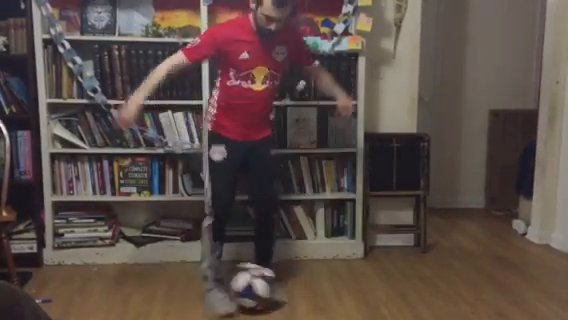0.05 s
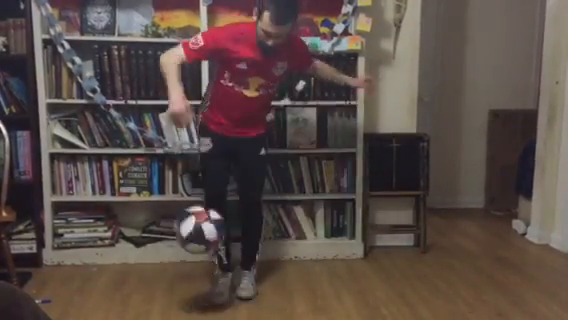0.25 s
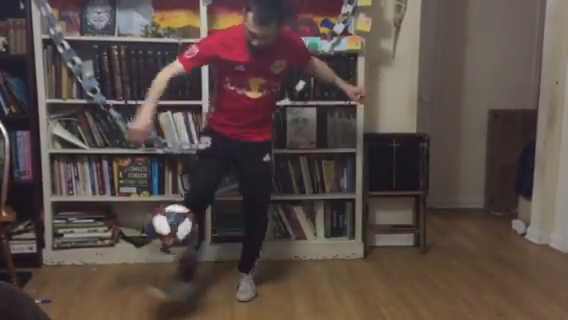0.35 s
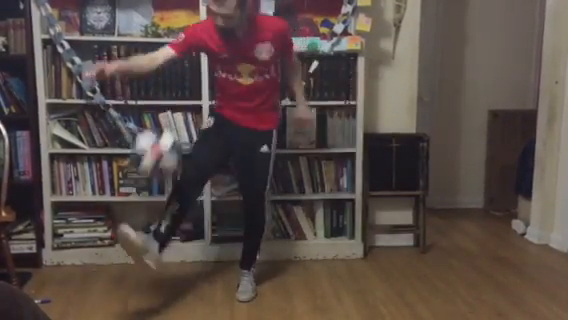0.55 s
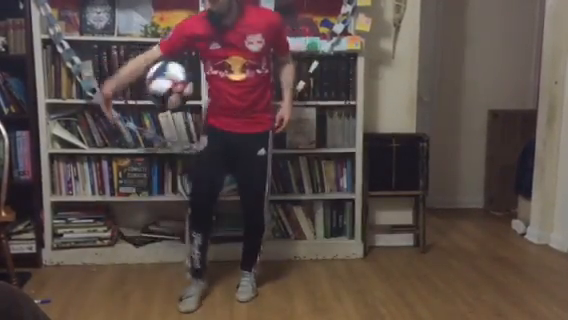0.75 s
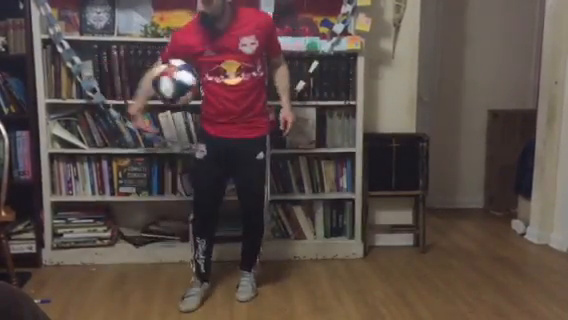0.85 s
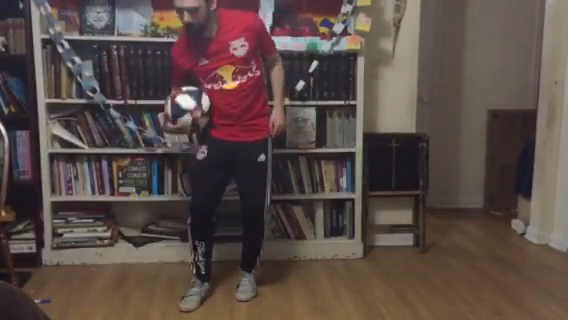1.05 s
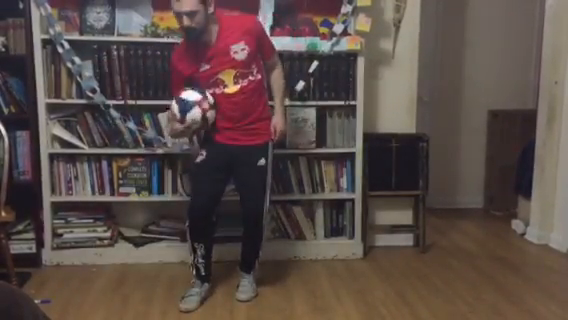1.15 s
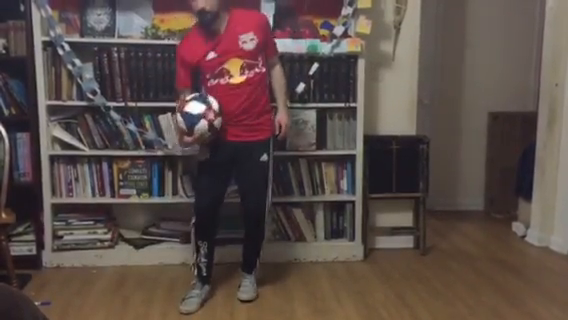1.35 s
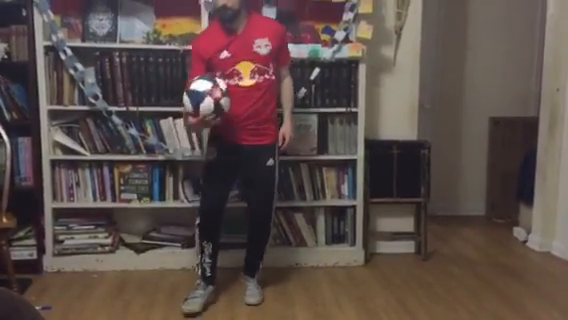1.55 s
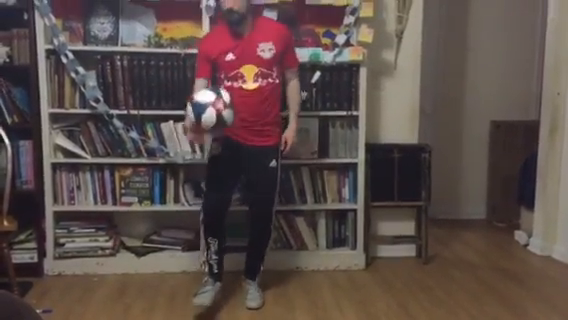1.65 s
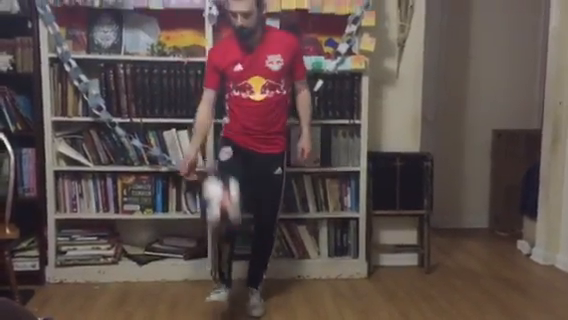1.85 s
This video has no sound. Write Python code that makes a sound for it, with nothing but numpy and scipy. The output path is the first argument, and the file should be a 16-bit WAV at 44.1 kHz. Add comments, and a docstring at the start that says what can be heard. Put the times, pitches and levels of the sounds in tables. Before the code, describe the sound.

A soccer ball scrapes off a wooden floor and is flicked up with a thump at about 0.2 seconds, followed at once by a short, sharp shoe squeak. A kick thuds at 0.5 seconds, the ball smacks a hand near 0.85 and settles with a duller bump at 1.1. Boards creak, clothes rustle and soft steps fall, with a faint tap at 1.5, all close in a small room.

```python
"""A faint rustle grows into a scrape as a soccer ball is dragged off a wooden floor. It is flicked up
with a sharp shoe squeak, kicked once and caught in the hand. Each blow thuds, smacks and briefly
rings the ball; boards creak and clothes rustle as the player finds his balance.
One microphone stands close by, in a small furnished room that answers over a faint background."""
import sys
import numpy as np
from scipy import signal
from scipy.fft import rfft, irfft
from scipy.io import wavfile
from scipy.ndimage import uniform_filter1d

SR = 44100
rng = np.random.default_rng(int(sys.argv[2]) if len(sys.argv) > 2 else 0)


def log_audio(samples):
    """Write samples as a 16-bit WAV file to the path given in sys.argv[1]."""
    # one column per channel
    frames = np.atleast_2d(samples).T
    # limit to full scale, then quantise
    limited = np.clip(frames, -1, 1)
    pcm = np.round(limited * 32767).astype(np.int16)
    wavfile.write(sys.argv[1], SR, pcm)


N = 83790
T = np.arange(N) / SR


def amp(db):
    """Decibels to gain."""
    return 10 ** (np.asarray(db) / 20)


def unit(x):
    """Scale to rms 1."""
    return x / np.std(x)


def noise(lo_hz, hi_hz, order=3):
    """Noise between two edges, rms 1."""
    sos = signal.butter(order, [lo_hz, hi_hz], "band", fs=SR, output="sos")
    return unit(signal.sosfilt(sos, rng.standard_normal(N)))


def coloured(points):
    """Noise with a spectrum of (Hz, dB) points, rms 1."""
    hz, db = np.array(points).T
    bins_hz = np.maximum(np.arange(N // 2 + 1) * SR / N, 1)
    gain = amp(np.interp(np.log(bins_hz), np.log(hz), db))
    return unit(irfft(rfft(rng.standard_normal(N)) * gain, N))


def waver(rate_hz):
    """Smooth random motion, spread 1."""
    width = int(SR / rate_hz)
    return unit(uniform_filter1d(uniform_filter1d(rng.standard_normal(N), width), width))


def highpass(x, hz, order):
    """Cut the bass."""
    return signal.sosfilt(signal.butter(order, hz, "high", fs=SR, output="sos"), x)


def strike(at, rise, t60, hold=0):
    """Envelope: straight rise, hold, exponential decay; times in seconds."""
    decaying_s = np.maximum(T - at - rise - hold, 0)
    return np.clip((T - at) / rise, 0, 1) * amp(-60 * decaying_s / t60)


def ring(at, hz, rise, t60):
    """One struck mode."""
    return strike(at, rise, t60) * np.sin(2 * np.pi * hz * (T - at))


# The room's background. Each row: frequency in Hz, relative level in dB.
AIR = [(15, -37.5), (25, -2.5), (72, 2), (229, -10.5), (384, -6.5), (476, -19.5), (1740, -23.5),
       (4030, -14), (4870, -25.5), (14800, -30.5), (16000, -45.5)]

def background():
    """A faint, steady rumble and hiss all around the microphone."""
    return amp(-66) * coloured(AIR)


# Spectra of the scrape and the hiss. Each row: frequency in Hz, relative level in dB.
SCRAPE_SPECTRUM = [(60, -7), (150, -3), (480, -2), (1100, -4), (2200, -11.5), (4500, -18), (16000, -42.5)]
HISS_SPECTRUM = [(500, -35), (2000, -8), (3800, 0), (7000, -2), (11000, -11.5), (16000, -6)]
# Rubbing close by. Each row: peak time in seconds, rise and fall in seconds per 15 dB,
# scrape and hiss levels in dB.
RUBS = [(.035, 0.062, 0.019, -63, -54.5), (0.137, 0.026, 0.023, -55.5, -39),
        (0.158, 0.011, 0.013, -34.5, -65), (0.201, 0.037, 0.055, -35, -42.5), (0.436, 0.13, 0.09, -73, -59),
        (.68, 0.069, 0.086, -76.5, -64), (.848, 0.036, 0.0069, -53, -80), (.880, .02, .035, -58.5, -44),
        (1.101, 0.046, 0.066, -58, -84), (1.27, .09, .07, -67.5, -68.5), (1.47, .04, 0.036, -63, -67),
        (1.545, 0.015, .04, -68, -55), (1.621, 0.081, 0.098, -68, -74.5), (1.799, 0.016, 0.034, -64.5, -70)]

def rubs():
    """Sole, ball and cloth rub in grainy swells of scrape and hiss."""
    out = np.zeros(N)
    scrape = unit(coloured(SCRAPE_SPECTRUM) * amp(1.47 * waver(290)))
    hiss = unit(coloured(HISS_SPECTRUM) * amp(3.5 * waver(500)))
    for at, rise, fall, scrape_db, hiss_db in RUBS:
        swell = amp(-15 * np.maximum((at - T) / rise, (T - at) / fall))
        out += swell * (amp(scrape_db) * scrape + amp(hiss_db) * hiss)
    return out


# Ticks near the microphone. Each row: start in seconds, level in dB.
LACE_TICKS = [(0.021, -58.5), (0.104, -56), (0.1444, -39), (0.18, -36), (0.375, -48), (0.424, -50.5),
              (.437, -48), (0.7283, -53.5), (1.229, -54), (1.2352, -47.5), (1.851, -57)]

def lace_ticks():
    """Laces and clothing make tiny bright clicks."""
    envelope = sum(amp(db) * strike(at, rise=0.0002, t60=0.0055) for at, db in LACE_TICKS)
    return envelope * noise(3100, 10800, order=2)


# Low modes of the wooden floor. Each row: frequency in Hz, level in dB, t60 in seconds.
BOARD_MODES = [(56, -1, 0.15), (79.6, -1, 0.18), (112, -15, .10)]

def thud(at):
    """The low bump of a foot and the boards under it."""
    return sum(amp(db) * ring(at, hz, rise=0.0037, t60=t60) for hz, db, t60 in BOARD_MODES)


# Modes of the ball's shell. Each row: frequency in Hz, level in dB, t60 in seconds.
BALL_MODES = [(145, -6.5, 0.041), (182.2, -4, .11), (314, -7.5, 0.045), (400, -4.5, 0.21),
              (512.3, -10, 0.12), (630, -1.5, 0.077), (805, 7, 0.02), (930, -12.5, .04), (1280, -2.5, .06),
              (1676, -5, 0.056), (1830, -11, .04)]
# Contact noise: body, smack, slap, crack. Each row: low and high edges in Hz, t60 in seconds.
CONTACT_BANDS = [(143, 306, 0.073), (425, 1104, 0.061), (1080, 2520, 0.034), (2270, 13000, 0.025)]
# Blows on the ball. Each row: start and rise in seconds, upper edge of the ring in Hz,
# then levels in dB of thud, ring, body, smack, slap and crack.
BLOWS = [(0.1773, 0.00067, 2510, -24, -31, -33, -28.5, -40.5, -47.5),
         (.5330, 0.0014, 4000, -35.5, -31, -36.5, -38, -39, -43.5),
         (0.851, 0.0018, 2500, -77, -27, -36.5, -28, -37, -45),
         (1.077, 0.0084, 644, -65, -35, -41, -51.5, -80, -60.5),
         (1.536, 0.0032, 1000, -77.5, -59, -57.5, -55.5, -62.5, -60)]

def ball():
    """Each blow thuds, rings the shell (softer contact, duller ring) and leaves a burst of noise."""
    squashed_s, snap_s = 0.0042, 0.0015
    shell, thuds = np.zeros(N), np.zeros(N)
    bands = [(noise(lo, hi), t60) for lo, hi, t60 in CONTACT_BANDS]
    for at, rise, edge_hz, thud_db, ring_db, *contact_db in BLOWS:
        thuds += amp(thud_db) * thud(at + 0.0028)
        for k, (hz, db, t60) in enumerate(BALL_MODES):
            rolloff = 1 / np.hypot(1, (hz / edge_hz) ** 2)
            shell += (-1) ** k * amp(ring_db + db) / 2 * rolloff * ring(at, hz, rise, t60)
        snap = 1 + 2.4 * np.exp(-np.maximum(T - at, 0) / snap_s)  # first contact is strongest
        for (band, t60), db in zip(bands, contact_db):
            shell += amp(db) * band * snap * strike(at, rise, t60, hold=squashed_s)
    return thuds + highpass(shell, hz=142, order=4)  # the small shell radiates little bass


# One slip of a shoe on the floor. Each row: time in seconds, pitch in Hz, level in dB.
SQUEAK_PATH = [(0.2422, 4450, -36), (0.246, 4270, -11), (.248, 4022, -6), (0.251, 3438, -5.5),
               (0.2512, 4075, -5), (0.254, 3876, 2.5), (0.2566, 3660, -12.5), (.260, 3506, -21.5),
               (.264, 3400, -62)]
# Its harmonics, lowest first. Each entry: level in dB.
SQUEAK_HARMONICS_DB = [-2, -20.5, -23.5, -37.5]

def shoe_squeak():
    """The rubber sole sticks and slips some four thousand times a second for an instant."""
    times, hz, db = np.array(SQUEAK_PATH).T
    pitch_hz = np.interp(T, times, hz) * (1 + 0.026 * waver(790))
    phase = 2 * np.pi * np.cumsum(pitch_hz) / SR
    tone = sum(gain * np.sin(k * phase) for k, gain in enumerate(amp(SQUEAK_HARMONICS_DB), 1))
    grit = amp(-39) * noise(3200, 8000)
    envelope = amp(np.interp(T, times, db)) * (T > times[0]) * (T < times[-1])
    return envelope * (tone + grit)


# Feet on the floor. Each row: start in seconds, thud and knock levels in dB.
STEPS = [(0.254, -55, -38), (0.662, -50, -52.5), (1.439, -48.5, -62.5), (1.799, -65, -78.5)]

def steps():
    """Soft footfalls: a thud and a dull knock of the boards."""
    out, knock = np.zeros(N), noise(120, 380)
    for at, thud_db, knock_db in STEPS:
        out += amp(thud_db) * thud(at)
        out += amp(knock_db) * knock * strike(at, rise=0.0037, t60=0.087)
    return out


# Creaks underfoot. Each row: start and length in seconds, pitch in Hz, level in dB,
# then overtone and rasp in dB relative to that level.
CREAKS = [(.451, 0.0061, 1729, -47.5, -29.5, -5), (0.4944, 0.012, 1660, -47.5, -24, -4.5),
          (0.504, .010, 1826, -53.5, -18, 0), (0.99, 0.017, 1630, -49, -22, -22),
          (1.123, 0.023, 1607, -61, -5, 6), (1.169, 0.0236, 1652, -38, -9.5, -8),
          (1.235, .016, 1565, -63.5, -5.5, 0), (1.778, 0.0204, 1926, -61.5, -14, 2)]

def board_creaks():
    """The boards stick and slip in short rough chirps with an overtone and a rasp."""
    overtone_hz = 3500
    out, rasp = np.zeros(N), noise(1040, 2500, order=2)
    phase_per_hz = 2 * np.pi * np.cumsum(1 + 0.06 * waver(624)) / SR
    for at, length, hz, db, overtone_db, rasp_db in CREAKS:
        gate = np.clip(np.minimum(T - at, at + length - T) / 0.0014, 0, 1)
        tone = np.sin(hz * phase_per_hz) + amp(overtone_db) * np.sin(overtone_hz * phase_per_hz)
        out += amp(db) * gate * (tone + amp(rasp_db) * rasp)
    return out


# Echoes off the nearby walls. Each row: delay in seconds, gain.
WALL_ECHOES = [(.0098, .22), (0.0204, .2)]
# The room's tail. Each row: low and high edges in Hz, t60 in seconds, level in dB.
ROOM_TAIL = [(45, 199, 0.91, -10.5), (200, 1200, 0.17, -1), (1120, 3200, 0.37, -2.5),
             (3160, 5200, 0.27, -6), (4520, 16000, 0.24, -2.5)]

def room(x):
    """Sound reaches the microphone directly, off the floor and two walls, then as a diffuse tail."""
    response = np.zeros(N)
    response[0] = 1
    floor_echo = (0.00634, 0.18)
    for delay, gain in [floor_echo, *WALL_ECHOES]:
        response[int(delay * SR)] += gain
    for lo, hi, t60, db in ROOM_TAIL:
        tail = noise(lo, hi) * strike(at=0.0023, rise=0.0027, t60=t60)
        band_share = 2 * (hi - lo) / SR
        response += amp(db) * tail * np.sqrt(band_share / np.sum(tail ** 2))
    return signal.fftconvolve(x, response)[:N]


def scene():
    """Ball, shoes and clothes in the room, in mono; extra direct sound brings the ticks closer."""
    ticks = lace_ticks()
    player = ball() + shoe_squeak() + board_creaks() + rubs() + steps() + amp(-2) * ticks
    return (amp(-1.5) * room(player) + ticks + background())[None]


def record(dry):
    """Microphone and recorder cut the deep bass and the top."""
    top_cut = signal.ellip(10, 0.2, 80, 16200, fs=SR, output="sos")
    return signal.sosfilt(top_cut, highpass(dry, hz=42, order=6))


dry = scene()
out = record(dry)
log_audio(out)
```